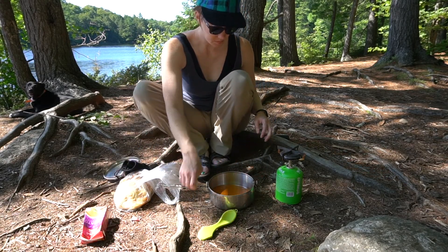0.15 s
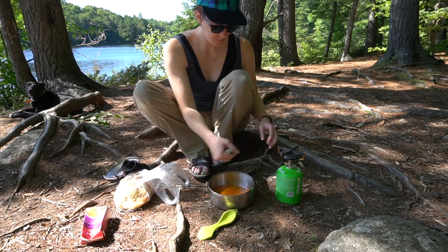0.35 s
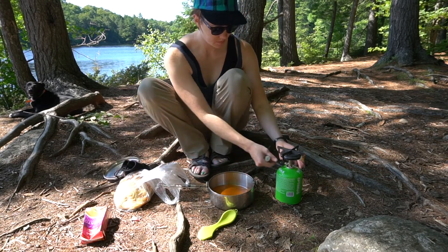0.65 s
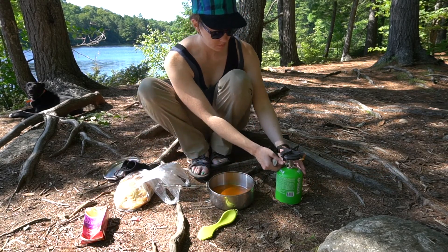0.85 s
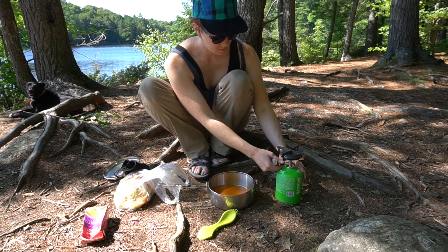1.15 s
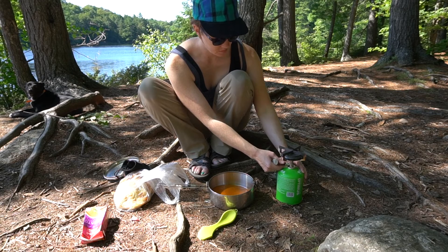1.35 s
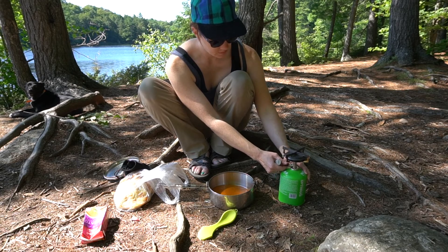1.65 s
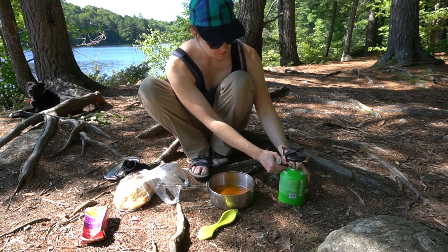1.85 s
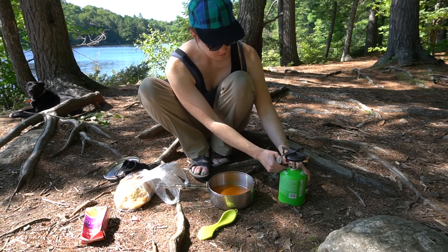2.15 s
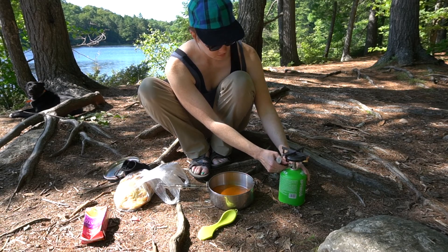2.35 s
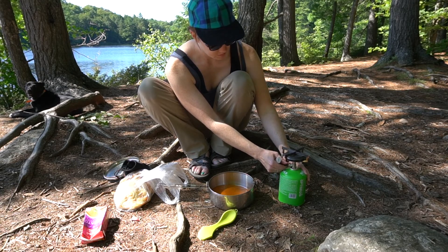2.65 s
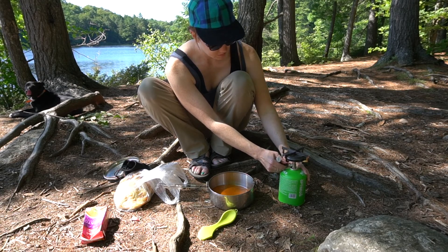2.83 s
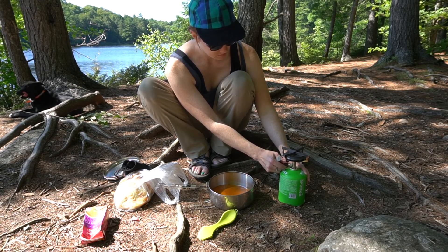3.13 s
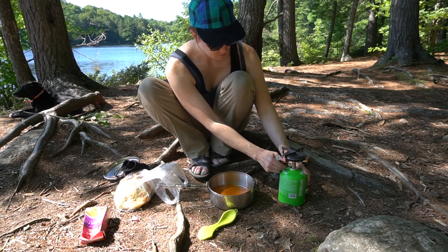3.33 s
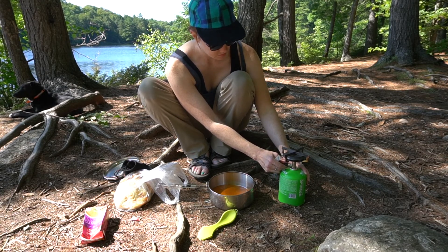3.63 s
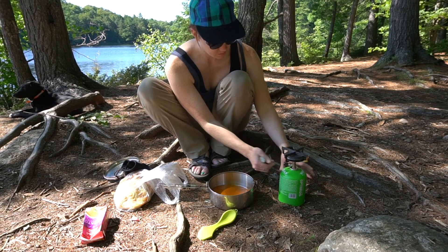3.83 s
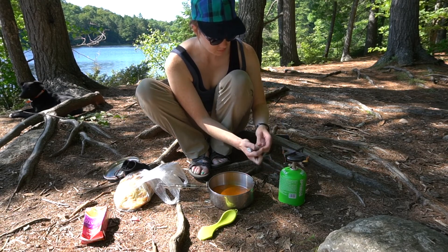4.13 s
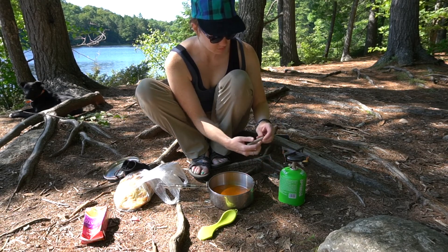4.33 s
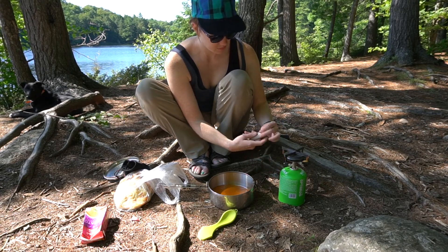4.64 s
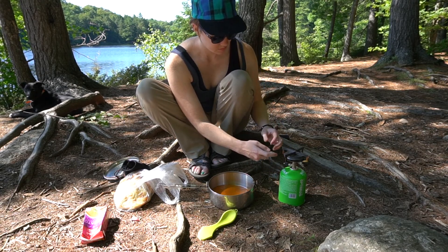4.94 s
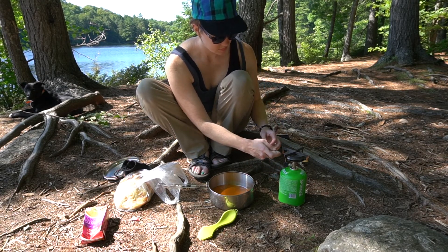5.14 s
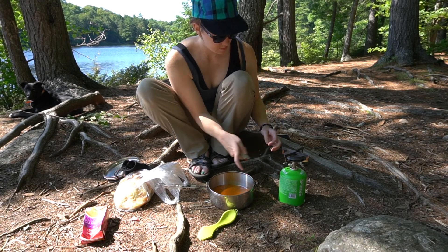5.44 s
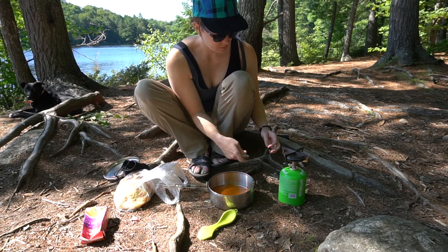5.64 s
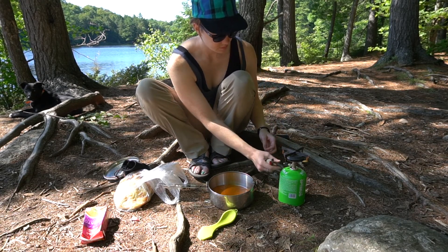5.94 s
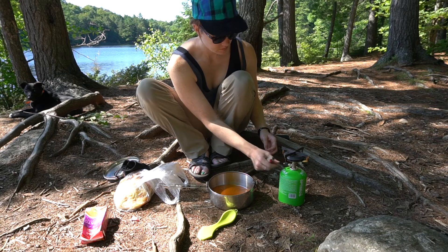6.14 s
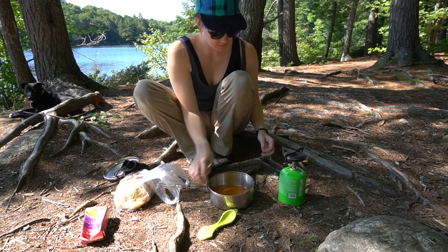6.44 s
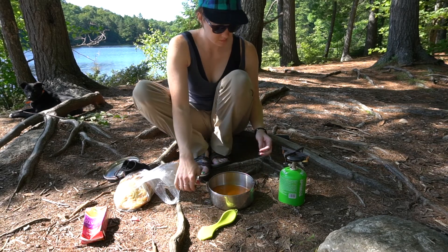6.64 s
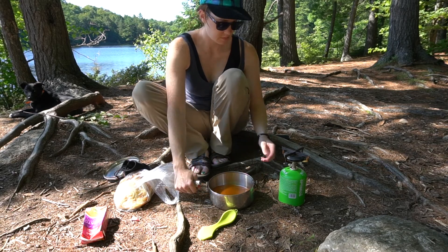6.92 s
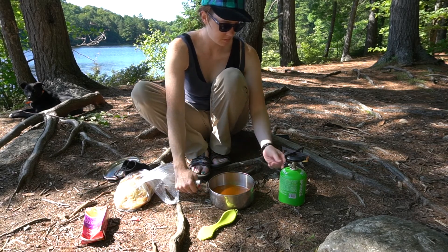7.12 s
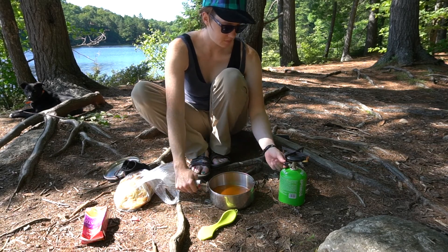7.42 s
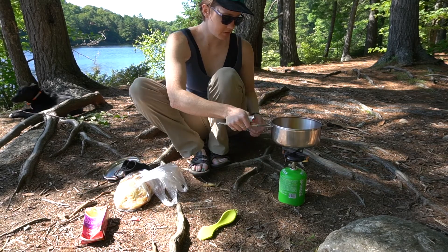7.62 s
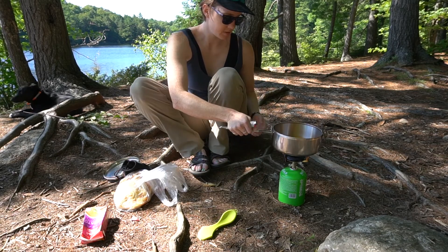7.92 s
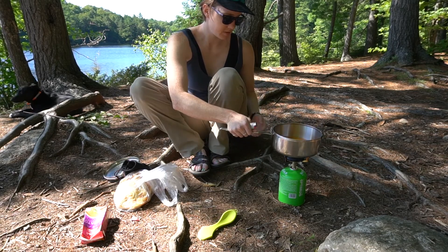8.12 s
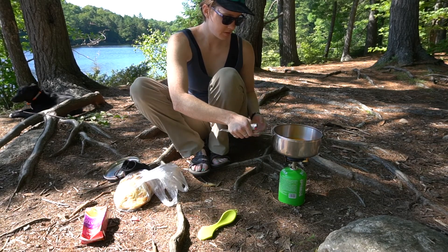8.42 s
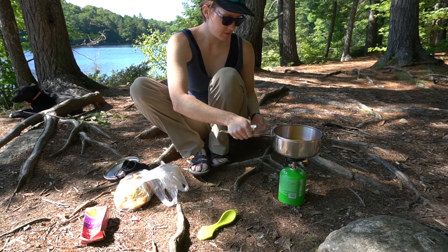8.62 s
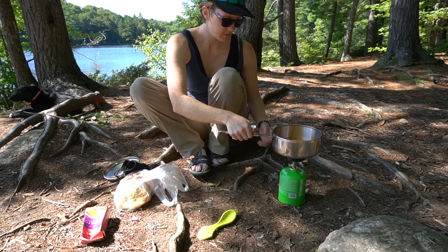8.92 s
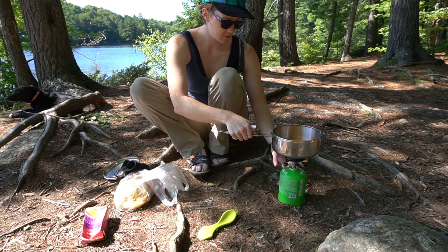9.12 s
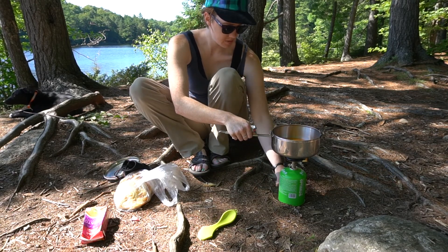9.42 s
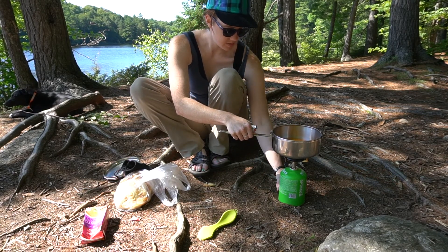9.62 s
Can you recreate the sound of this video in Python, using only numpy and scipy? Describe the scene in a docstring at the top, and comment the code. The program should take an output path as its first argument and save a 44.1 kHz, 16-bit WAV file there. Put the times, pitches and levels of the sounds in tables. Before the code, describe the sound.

A faint, soft wash of far water and leaves lies behind close hand sounds in open air. A sharp dry snap lands at 0.1 s, then a small box is picked up with a light scratch around 0.4-0.6. Metal frame rubs and ticks come at 1.4-1.6, and grainy rustling at 2.6 with fine snaps. From about 3.2 gas hiss rises, peaking near 3.8 and staying bright and pipe-like. At 5.25 a loud lighter-wheel scrape cracks; the flame catches, surges around 5.5 and settles into a low, slightly flapping roar. At 6.8 a steel grip clacks onto a pot, and draughty flaps follow near 7. A low thump at 7.64 marks a cut: hiss and roar become quieter and duller. The pot knocks and rattles on the supports at 8.45-8.8. Soft shifting returns at 9.4-9.75 over continued burning.

```python
"""Gas camping stove by a lake.

Far water and leaves wash behind rustling hands (grainy noise, rubbed resonances). The valve opens and the jet hisses
(noise through tube modes), a lighter wheel scrapes and the flame catches with a low roar (banded noise that flaps).
A steel grip clamps a pot (decaying modes over a crack). With a low thump the scene cuts to a quieter, duller view of
the burning stove, where the pot knocks on the supports. Snaps and metal get a short scattered answer from the ground."""
import sys
import numpy as np
from scipy import signal
from scipy.fft import rfft, irfft, next_fast_len
from scipy.io import wavfile
from scipy.ndimage import uniform_filter1d, map_coordinates

SR = 44100
rng = np.random.default_rng(int(sys.argv[2]) if len(sys.argv) > 2 else 0)


def unload_wav(signal):
    """Save mono or channel-first audio to the path in sys.argv[1] as 16-bit WAV at rate SR, clipped to [-1, 1]."""
    wavfile.write(
        sys.argv[1],
        SR,
        np.round(np.clip(np.atleast_2d(signal).T, -1, 1) * 32767).astype(np.int16),
    )


N = 430857

# Spectra. Each row: frequency in Hz, relative density in dB per Hz.
# Far water and leaves; cloth and dry needles; broad jet noise; flame before the cut; flame after the cut.
WOODS_SPECTRUM = [(24, -76), (40, -43.5), (282, -21), (327, -21.5), (362, -17), (582, -6), (912, -6.5),
                  (1170, -5), (1360, -11), (4410, -10.5), (5000, -12.5), (13600, -19), (15800, -16)]
RUSTLE_SPECTRUM = [(120, -50), (200, -33), (346, -12), (517, -13.5), (1200, -9), (4310, -10.5),
                   (5090, -11.5), (9820, 2), (15800, 2.5)]
JET_SPECTRUM = [(180, -69), (300, -24.5), (1920, -10), (2230, -4.5), (2510, -9), (3730, -14.5), (5380, -2),
                (6670, -11.5), (9770, -10.5), (15800, -24)]
ROAR_SPECTRUM = [(35, -57), (60, -22), (216, -2.5), (384, -3.5), (517, -11), (653, -9), (752, -22.5),
                 (935, -14.5), (1540, -24.5), (2310, -24), (2500, -19.5), (3250, -41), (5500, -120)]
ROAR_AFTER_SPECTRUM = [(35, -51), (60, -32), (118, -0.5), (176, -4), (229, 3), (291, -5.5), (384, -1),
                       (451, -3), (531, -11.5), (736, -19), (855, -19), (1100, -37), (1200, -36),
                       (1560, -56), (2640, -120)]

# Stereo of the woods and the jet. Each row: frequency in Hz, left-right likeness 0 to 1.
WOODS_LIKENESS = [(60, 0.98), (240, 0.53), (950, 0.12), (3770, 0.14), (15000, 0.22)]
JET_LIKENESS = [(60, 0.93), (240, 0.41), (950, 0.74), (3770, 0.92), (15000, 0.54)]
# Balance of the jet. Each row: frequency in Hz, left minus right in dB.
JET_BALANCE_DB = [(60, 0.0), (180, 2), (550, -2), (1650, -5), (4970, -3), (15000, -1.5)]

# Resonances. Each row: centre in Hz, width in Hz, relative level in dB.
# Burner frame under a rubbing hand; small box picked up; burner head.
FRAME_MODES = [(2790, 110, -3), (3410, 75, -4), (3740, 120, -5), (4980, 200, -6.5), (5430, 200, -5.5),
               (6970, 300, -17), (7800, 540, -11.5), (9900, 400, -11.5), (11060, 760, -13),
               (6100, 5600, -18)]
BOX_MODES = [(946, 330, -6), (1810, 200, -3.5), (2330, 230, 0.5), (3510, 350, -11), (3920, 180, -12),
             (4670, 280, -12), (2800, 1800, -15)]
BURNER_MODES = [(141, 75, 1.5), (215.4, 52, 1.5), (250, 13, -4), (323, 32, -3.5), (390, 58, 1),
                (597, 68, -7)]
# Mixing tube before the cut; tube after the cut; the tube's lowest strong mode, with its own level.
TUBE_MODES = [(2195, 540, -6), (2790, 86, -3.5), (4586, 450, 0.5), (5410, 440, 3), (6170, 350, -8.5),
              (7900, 320, -11.5), (8000, 280, -18), (8480, 260, -3.5), (9850, 730, -3.5), (10400, 450, -6),
              (11060, 390, -9.5), (12050, 460, -9.5), (12500, 700, -20), (14700, 1300, -10.5),
              (15500, 970, -16), (13400, 600, -19), (2620, 84, -7.5), (895, 250, -14.5)]
TUBE_AFTER_MODES = [(2160, 310, -3), (2730, 460, 1.5), (4650, 430, -19), (5360, 660, 2.5), (6280, 220, 0),
                    (7020, 300, -5.5), (8430, 300, -5.5), (9900, 660, 0.5), (10700, 330, -4),
                    (12500, 700, -10), (14800, 1000, -7.5)]
TUBE_LOW_MODE = [(2279, 85, 0)]

# Levels. Each row: time in seconds, level in dB (before random wobble and any drop).
# A breeze dying down; hiss of the tube; its lowest mode; flame spreading round the head.
WOODS_LEVEL_DB = [(0.0, -56.5), (0.22, -56.5), (0.69, -57.5), (1.2, -58), (3.2, -58.5)]
TUBE_LEVEL_DB = [(3.15, -81), (3.32, -60.5), (3.6, -48), (3.772, -41.5), (3.87, -43), (4.25, -48),
                 (5.11, -48), (5.36, -49), (6.2, -48), (6.68, -49.5), (7.47, -51.5), (7.94, -50.5),
                 (8.68, -46), (8.88, -52), (9.5, -46), (9.77, -46)]
LOW_MODE_LEVEL_DB = [(3.3, -82), (3.85, -57), (5.04, -56), (5.7, -71), (6.05, -67), (6.28, -78.5),
                     (6.63, -60), (6.9, -60.5), (7.47, -65), (7.63, -84), (7.84, -71.5), (8.64, -66.5),
                     (9.77, -66.5)]
CATCH_LEVEL_DB = [(5.2, -83), (5.245, -76), (5.27, -60), (5.33, -50.5), (5.42, -45.5)]

# Strokes. Each row: start of hold in seconds, level in dB, rise, hold and fall in seconds (rise, fall per SPAN_DB).
# The sign of a hold is ignored.
# Frame rubs; box rubs; lighter wheel scrape, then flint fizz.
FRAME_STROKES = [(1.1, -67.5, .08, 0.28, .05), (1.422, -55.5, 0.018, 0, .12), (1.498, -53.5, .035, 0, 0.2),
                 (1.58, -61, 0.14, .08, .06)]
BOX_STROKES = [(0.42, -52.5, .03, 0.017, 0.18), (0.555, -60, 0.11, 0.11, 0.4)]
WHEEL_STROKES = [(5.233, -34.5, 0.0091, 0.021, .012), (5.258, -46.5, .01, .015, .02)]
# Hard flaps in a draught; the row at 7.635 s is no flap but a low thump at the scene cut.
FLAP_AND_THUMP_STROKES = [(5.06, -74, .07, 0, .1), (5.2, -64, .05, 0, .06), (5.29, -60, .07, 0, .5),
                          (5.55, -68, .5, 0, .5), (6.45, -58, 0.072, .13, 0.27),
                          (6.95, -55.5, .4, 0.33, .16), (7.635, -62, .03, .015, .03),
                          (9.52, -72, .15, 0, .45)]
# The flame's first surge: one such row.
SURGE_STROKE = (5.5, -48, 0.23, -1.5, .5)
# Cloth and feet shift; the first row is the body of the opening snap.
# Each row: a stroke as above, then left minus right in dB, dull part re bright in dB.
SHIFT_AND_SNAP_STROKES = [(.08, -41.5, .012, 0.0045, .015, 2, -13), (0.117, -67, .06, 0.17, .2, 2, 6),
                          (1.1, -64, .05, 0, .3, -.5, -13), (1.194, -56, 0.058, 0, 0.13, -1, -15),
                          (1.78, -63, .15, 0.12, .1, -1, -4), (2.572, -53, 0.074, 0.22, 1.05, 3.5, -7.5),
                          (2.624, -51, 0.18, 0.036, .03, 6, -7.5), (9.388, -54, .1, 0, .25, -2, -9),
                          (9.522, -58, .3, 0, 0.27, -2, -12), (9.746, -54, 0.041, 0.012, .12, -2.5, -1)]
# Broad jet noise opens: full at in seconds, level in dB, rise in seconds per SPAN_DB.
JET_OPENING = (3.74, -48.5, 0.57)

# Dry snaps. Each row: start in seconds, level in dB, centre in Hz, t60 in seconds, left minus right in dB.
SNAP_EVENTS = [(.076, -29.5, 9100, 0.012, 6), (0.104, -49, 4700, .012, .5), (0.406, -43.5, 2600, .012, -1),
               (1.3655, -51, 8100, .01, -.5), (1.421, -41, 7000, 0.0059, -5), (1.457, -51, 8000, .01, -1.5),
               (1.4953, -38, 6000, 0.0055, -4), (2.6635, -51, 11000, .006, 5), (2.682, -41, 12300, .006, 5),
               (2.6875, -42, 11500, .006, 2), (2.769, -42, 10700, 0.0088, 3.5),
               (3.377, -40, 18000, 0.0059, 8), (5.2469, -15, 8150, 0.015, -3.5)]

# Ringing parts. Each row: frequency in Hz, level in dB, t60 in seconds.
# Steel grip; full pot; tapped frame.
GRIP_MODES = [(1412, -5, 0.11), (2840, -19, .08), (3444, -7, 0.08), (4662, -2, 0.079), (5200, -7, 0.088),
              (6500, -3, 0.11), (6670, -5, 0.048), (7270, 3, 0.043), (8250, 1, 0.034), (8500, -11, 0.069),
              (8900, -3, 0.075), (10270, 1, 0.031), (12100, -5, 0.036), (12900, -17, .04), (14400, -9, .04),
              (1350, -10, .06), (3670, -26, 0.056)]
POT_MODES = [(730, -13, 0.12), (875, -12, 0.22), (992, -5, 0.073), (2099, -15.5, 0.14), (2220, -22, 0.083),
             (2606, 4, 0.069), (2680, 8, 0.042), (2840, -11, 0.28), (2970, -6, 0.068), (3280, -7, 0.054),
             (3400, -0.5, 0.074), (4130, -11.5, 0.079), (5700, -12, 0.065), (6600, -5, 0.029),
             (8872, -16, .04), (10400, -25, .05)]
FRAME_RING_MODES = [(2760, 3, 0.12), (3730, -10, .1), (5150, -13, .1), (5450, -10, .1), (9880, -16, .05)]
# Blows on these. Each row: start in seconds, level in dB, attack time constant in seconds,
# tilt in dB per octave, favoured frequency in Hz, favour in dB.
GRIP_BLOWS = [(6.824, -42.5, 0.0015, -4, 1400, 7), (6.8269, -28, .002, 2, 8600, 2.5),
              (6.834, -38, 0.0037, -4, 4700, -1), (6.842, -38, 0.0024, 1, 6460, 4),
              (6.866, -39.5, .003, -5, 2860, 20), (6.873, -43, 0.0028, -3, 3500, 13.5)]
POT_BLOWS = [(8.464, -46, 0.0024, -1, 2600, 4), (8.467, -35, 0.0025, 1, 2580, 1.5),
             (8.531, -46.5, 0.0036, 0, 3020, 4), (8.558, -55, .004, -4, 3300, 3),
             (8.597, -37, 0.0018, 0.5, 2700, 2), (8.604, -41.5, 0.0041, 4, 3400, 5),
             (8.627, -43.5, 0.0023, -2, 2680, 1.5), (8.76, -44.5, .001, 1.5, 2450, 7.5),
             (8.773, -60, .003, -1, 2520, 9)]
FRAME_BLOWS = [(1.42, -52.5, .001, -3, 2750, 2.5), (1.495, -49.5, .001, -8, 5200, 1)]

TOP_HZ = 15780
SPAN_DB = 30  # a rise or fall time covers this many dB
CUT_S = 7.64  # the scene cuts to a quieter, duller view
TUBE_DROP_DB, JET_DROP_DB, ROAR_DROP_DB = 10, 14, 8  # lost at the cut
BURN_DB, SETTLE_S, SAG_DB_PER_S = -44.2, 6.26, 0.63  # roar level before the drop, reached when, fading by
FLAP_S, FLAP_DB = 5.0, -83.5  # gentle flapping from here on


def amp(db):
    """Gain of a level in dB."""
    return 10 ** (np.asarray(db) / 20)


def unit(x):
    """x scaled to rms 1."""
    return x / np.sqrt(np.mean(x ** 2) + 1e-20)


def along(points, hz):
    """(Hz, value) points interpolated on a log axis."""
    f, v = np.transpose(points)
    return np.interp(np.log(hz + 1), np.log(f + 1), v)


def curve(rows, **outside):
    """(s, value) rows interpolated to every sample."""
    s, value = np.transpose(rows)
    return np.interp(np.arange(N) / SR, s, value, **outside)


def wobble(knots_per_s):
    """A smooth random curve from normal knots."""
    coarse = np.arange(0, N + 32, 32)
    knots = rng.standard_normal(int(N * knots_per_s / SR) + 4)
    return np.interp(np.arange(N), coarse, map_coordinates(knots, [coarse * knots_per_s / SR]))


def after_cut():
    """True for samples after the scene cut."""
    return np.arange(N) > CUT_S * SR


def dropped(drop_db):
    """Gain that steps down at the scene cut."""
    return np.where(after_cut(), amp(-drop_db), 1)


def placed(pan_db):
    """Left and right gains for a left-minus-right level."""
    return amp(np.multiply.outer([.5, -.5], pan_db))


def smooth(spectrum):
    """Gain over frequency of a smooth spectrum."""
    return lambda hz: amp(along(spectrum, hz))


def peaks(modes):
    """Gain over frequency of resonances whose powers add."""
    def gain(hz):
        return np.sqrt(sum(amp(2 * db) / (1 + (2 * (hz - centre) / width) ** 2) ** 2
                           for centre, width, db in modes))
    return gain


def rush(gain, alike, patchy_db, balance=((1000, 0),)):
    """Stereo noise of rms 1, its time-frequency patches at random gains, shaped by gain(hz)."""
    z = signal.stft(rng.standard_normal((2, N)), nperseg=512)[2]
    field = rng.standard_normal(z.shape[1:])
    field = uniform_filter1d(uniform_filter1d(field, size=6, axis=0), size=10, axis=1)
    pair = signal.istft(z * amp(patchy_db * unit(field)), nperseg=512)[1][:, :N]
    m = next_fast_len(N)
    hz = np.fft.rfftfreq(m, 1 / SR)
    # mid and side shares set the left-right correlation
    turn = np.arccos(np.clip(along(alike, hz), -1, 1)) / 2
    mid, side = rfft(pair, m) * gain(hz) * [np.cos(turn), np.sin(turn)]
    left_right = placed(along(balance, hz)) * [mid + side, mid - side]
    return unit(irfft(left_right, m)[:, :N])


def add_stroke(out, x, s, db, rise, hold, fall):
    """Adds gain x under a rise, a hold and a fall, straight in dB."""
    rise, hold, fall = rise + 1e-4, abs(hold), fall + 1e-4
    a = max(int((s - 2 * rise) * SR), 0)
    b = min(int((s + hold + 2 * fall) * SR), N)
    t = np.arange(a, b) / SR - s
    away = np.maximum(np.maximum(-t / rise, (t - hold) / fall), 0)
    out[..., a:b] += amp(db - SPAN_DB * away) * x


def strokes(rows):
    """Gain over time of a table of strokes."""
    out = np.zeros(N)
    for row in rows:
        add_stroke(out, 1, *row)
    return out


def struck(modes, blows, crack_db, crack_top_hz, crack_t60, scatter_db):
    """Blows favour modes near a frequency; these ring unsteadily as parts rattle, over a short crack."""
    out, t = np.zeros(N + SR), np.arange(SR // 6) / SR
    hz, level, t60 = np.transpose(modes)[:, :, None]
    band = signal.butter(2, [1500, crack_top_hz], "bandpass", fs=SR, output="sos")
    for s, db, attack, tilt_db, near_hz, near_db in blows:
        # wandering phase widens each line
        rattle = np.cumsum(rng.normal(0, 0.039, (len(modes), len(t))), axis=1)
        favour = near_db * np.exp(-(np.log2(hz / near_hz) / .16) ** 2)
        scatter = scatter_db * rng.standard_normal(hz.shape)
        strength = level + tilt_db * np.log2(hz / 3000) + favour + scatter
        phase = 2 * np.pi * (hz * t + rng.random(hz.shape)) + rattle
        ring = np.sum(amp(strength - 60 * t / t60) * np.sin(phase), axis=0)
        noise = signal.sosfilt(band, rng.standard_normal(len(t)))
        crack = amp(crack_db - 60 * t / crack_t60) * noise
        out[round(s * SR):][:len(t)] += amp(db) * (ring + crack) * (1 - np.exp(-t / attack))
    return out[:N]


def woods():
    """Lake and trees: a wash of smooth-spectrum noise with a slowly wandering level."""
    level_db = curve(WOODS_LEVEL_DB) + 1.24 * wobble(1.624)
    return amp(level_db) * rush(smooth(WOODS_SPECTRUM), WOODS_LIKENESS, patchy_db=1.04)


def ground(x):
    """A brief scattered answer from ground and trunks: decaying noise, unlike in each channel."""
    t = np.arange(SR // 4) / SR
    tail = rng.standard_normal((2, len(t))) * amp(-60 * t / 0.038)
    return signal.fftconvolve(x, tail / np.linalg.norm(tail[0]), axes=1)[:, :N]


def hands():
    """Rustling (and the opening snap's body) is grainy noise; rubbing drives the resonances of what is touched."""
    grain = amp(1.1 * wobble(300) + 0.24 * wobble(30))
    rustle = smooth(RUSTLE_SPECTRUM)
    # bright and dull parts split at 6500 Hz
    bright = rush(lambda hz: rustle(hz) / (1 + (6500 / (hz + 1)) ** 6), [(1000, 0.44)], patchy_db=2.5)
    dull = rush(lambda hz: rustle(hz) / (1 + (hz / 6500) ** 6), [(1000, 0.12)], patchy_db=2.5)
    bright_gain, dull_gain = np.zeros((2, 2, N))
    for s, db, rise, hold, fall, pan_db, dull_db in SHIFT_AND_SNAP_STROKES:
        sides = placed(pan_db)[:, None]
        add_stroke(bright_gain, sides, s, db, rise, hold, fall)
        add_stroke(dull_gain, sides, s, db + dull_db, rise, hold, fall)
    out = (bright_gain * bright + dull_gain * dull) * unit(grain)
    for modes, rows in ((FRAME_MODES, FRAME_STROKES), (BOX_MODES, BOX_STROKES)):
        rubbed = rush(peaks(modes), [(1000, 0.88)], patchy_db=1.6, balance=[(1000, -1.5)])
        out = out + strokes(rows) * amp(1.5 * wobble(62.5)) * rubbed
    return out


def snaps():
    """Short dry bursts of band noise, and the lighter wheel as shaped noise."""
    out, t = np.zeros((2, N + SR)), np.arange(2048) / SR
    attack = 1 - np.exp(-t / 0.00011)
    for s, db, hz, t60, pan_db in SNAP_EVENTS:
        edges_hz = [hz * 0.38, min(hz * 2.0, SR / 2 - 1000)]
        band = signal.butter(2, edges_hz, "bandpass", fs=SR, output="sos")
        burst = unit(signal.sosfilt(band, rng.standard_normal(len(t)))) * amp(db - 60 * t / t60)
        start = round(s * SR)
        out[:, start:start + len(t)] += placed(pan_db)[:, None] * burst * attack
    flint_spectrum = [(500, -33), (2000, -7.0), (5000, -4), (10000, -12), (15000, -6)]
    flint = rush(smooth(flint_spectrum), [(1000, .9)], patchy_db=2.0)
    return out[:, :N] + strokes(WHEEL_STROKES) * flint


def metalwork():
    """Grip, pot and frame: struck modes, each part at its own place."""
    grip = struck(GRIP_MODES, GRIP_BLOWS, crack_db=7.5, crack_top_hz=15500, crack_t60=0.036, scatter_db=0.3)
    pot = struck(POT_MODES, POT_BLOWS, crack_db=5.5, crack_top_hz=8800, crack_t60=0.039, scatter_db=1.7)
    frame = struck(FRAME_RING_MODES, FRAME_BLOWS, crack_db=-9, crack_top_hz=12000, crack_t60=.02,
                   scatter_db=2.0)
    return placed(0.89)[:, None] * grip + placed(-4.5)[:, None] * pot + placed(-2.5)[:, None] * frame


def gas():
    """Turbulent jet noise, partly coloured by the pipe modes of the mixing tube."""
    tube_before = rush(peaks(TUBE_MODES), JET_LIKENESS, 1.8, JET_BALANCE_DB)
    tube_after = rush(peaks(TUBE_AFTER_MODES), JET_LIKENESS, 0.82, JET_BALANCE_DB)
    tube = np.where(after_cut(), tube_after, tube_before)
    hiss = amp(curve(TUBE_LEVEL_DB, left=-120)) * dropped(TUBE_DROP_DB) * tube
    low_noise = rush(peaks(TUBE_LOW_MODE), [(1000, 0.97)], 1.8, JET_BALANCE_DB)
    low = amp(curve(LOW_MODE_LEVEL_DB, left=-120)) * low_noise
    full_s, jet_db, rise_s = JET_OPENING
    opening = strokes([(full_s, jet_db, rise_s, N / SR, 1)])
    jet = rush(smooth(JET_SPECTRUM), JET_LIKENESS, 1.24, JET_BALANCE_DB)
    broad = opening * dropped(JET_DROP_DB) * jet
    return amp(0.67 * wobble(8)) * (hiss + broad) + low


def flame():
    """Uneven burning roars through the burner head and flaps slowly; the thump at the cut shares the flap noise."""
    end_s = N / SR
    steady = [(SETTLE_S, BURN_DB), (end_s, BURN_DB - SAG_DB_PER_S * (end_s - SETTLE_S))]
    burn_db = curve(CATCH_LEVEL_DB + steady, left=-120) + .4 * wobble(3.5)
    burn = np.hypot(amp(burn_db), strokes([SURGE_STROKE])) * dropped(ROAR_DROP_DB)

    def head(hz):
        """Flame spectrum through the burner head."""
        return smooth(ROAR_SPECTRUM)(hz) * np.hypot(.6, peaks(BURNER_MODES)(hz))

    alike, balance = [(100, 1.0), (500, 0.98), (1500, 0.83)], [(100, 0), (1000, -2.0)]
    roar_before = rush(head, alike, 1.03, balance)
    roar_after = rush(smooth(ROAR_AFTER_SPECTRUM), alike, 0.8, balance)
    roar = np.where(after_cut(), roar_after, roar_before)
    roar = unit(roar * amp(0.7 * wobble(30)))
    flap_spectrum = [(15, -30), (30, -12), (60, -6.5), (100, -2), (160, -29.5)]
    flap = rush(smooth(flap_spectrum), [(60, 0.87)], patchy_db=0.0)
    flap = unit(flap * amp(0.79 * wobble(12)))
    gentle = (np.arange(N) > FLAP_S * SR) * amp(FLAP_DB + 2.9 * wobble(5.5))
    return burn * roar + (gentle + strokes(FLAP_AND_THUMP_STROKES)) * flap


def scene():
    """All layers, with the ground answering metal and snaps."""
    metal = metalwork()
    dry_snaps = snaps()
    answer = ground(amp(-9) * metal + amp(-8) * dry_snaps)
    return woods() + answer + hands() + dry_snaps + metal + gas() + flame()


def record(dry):
    """Nothing is kept above the band limit."""
    m = next_fast_len(N + 8192)
    hz = np.fft.rfftfreq(m, 1 / SR)
    return irfft(rfft(dry, m) * (hz < TOP_HZ), m)[..., :N]


dry = scene()
out = record(dry)
unload_wav(out)
```